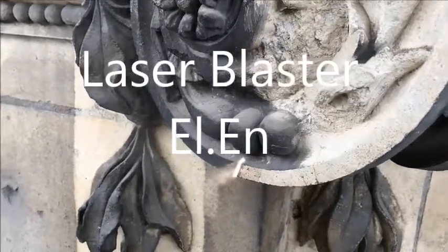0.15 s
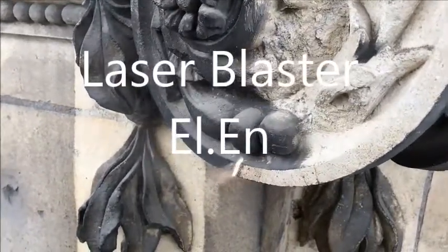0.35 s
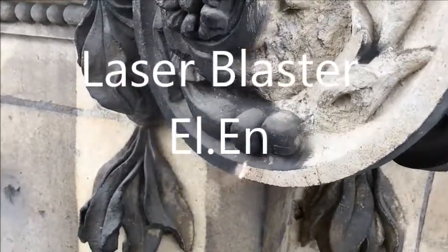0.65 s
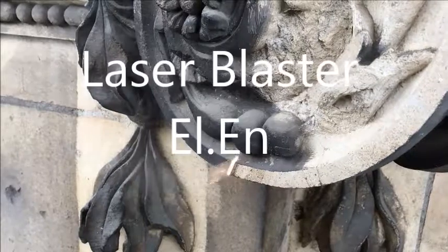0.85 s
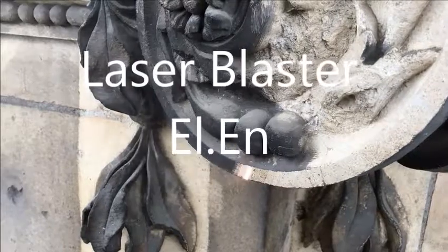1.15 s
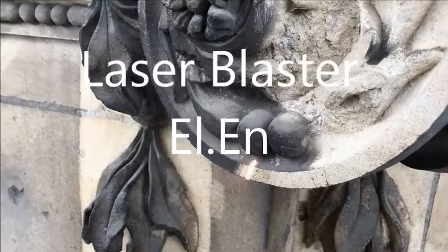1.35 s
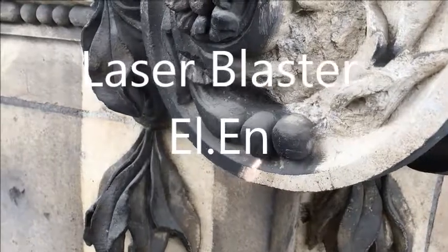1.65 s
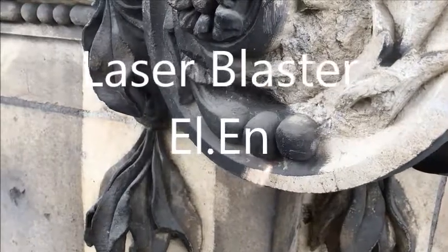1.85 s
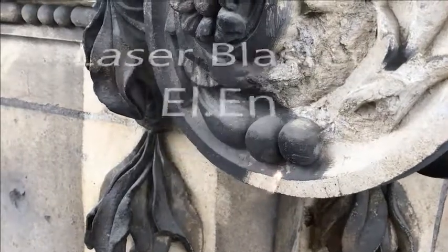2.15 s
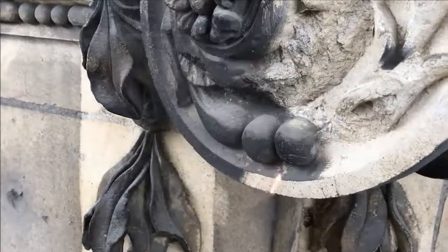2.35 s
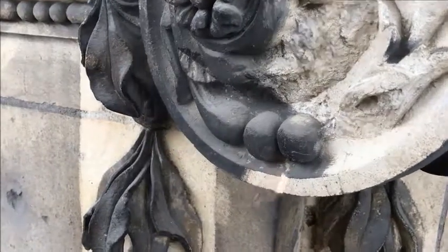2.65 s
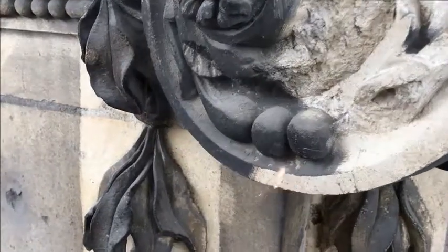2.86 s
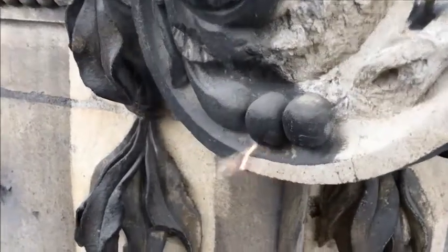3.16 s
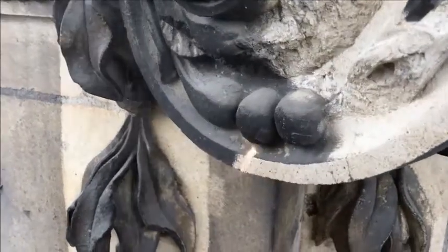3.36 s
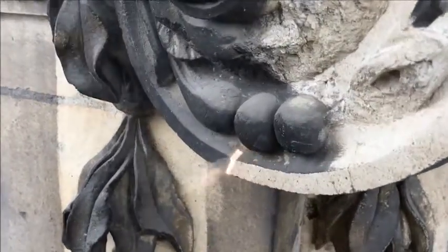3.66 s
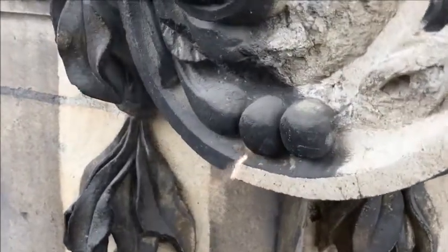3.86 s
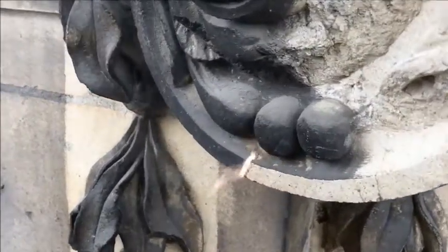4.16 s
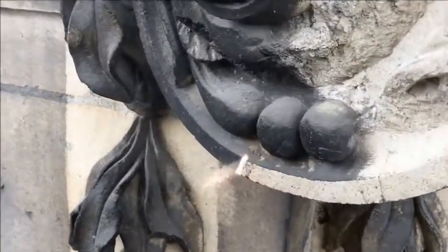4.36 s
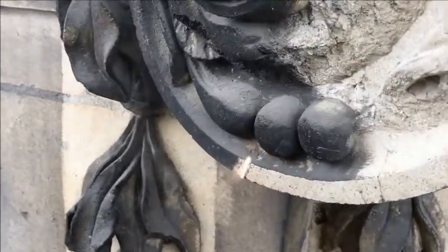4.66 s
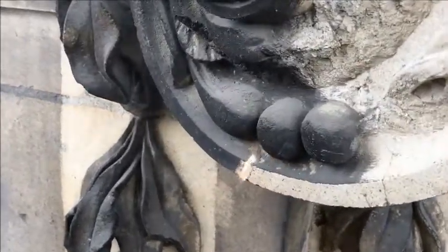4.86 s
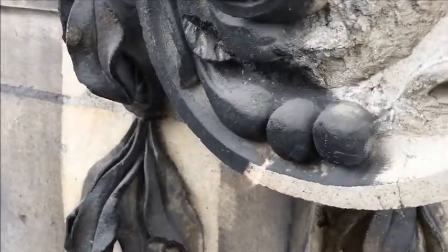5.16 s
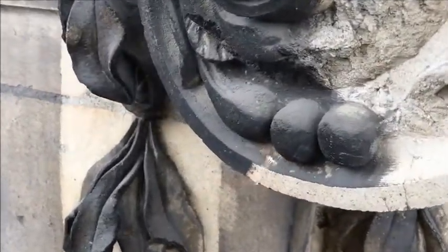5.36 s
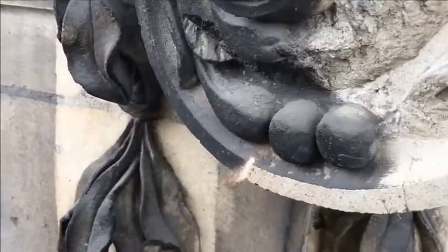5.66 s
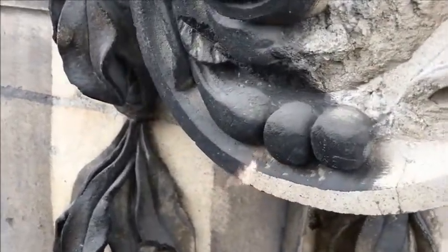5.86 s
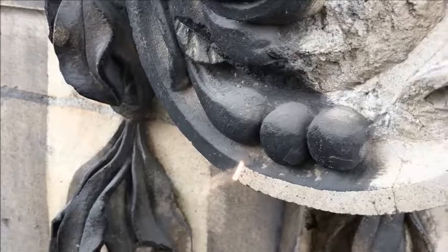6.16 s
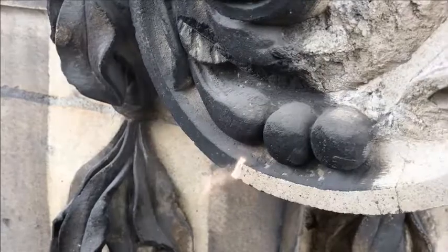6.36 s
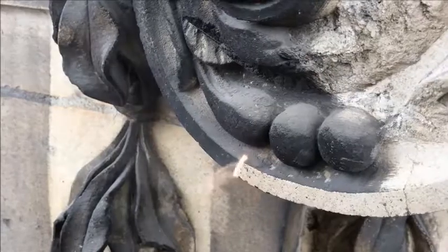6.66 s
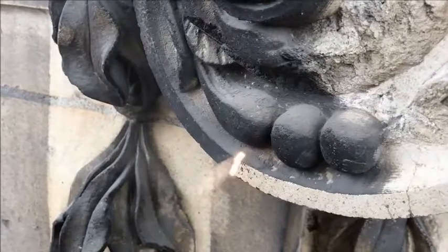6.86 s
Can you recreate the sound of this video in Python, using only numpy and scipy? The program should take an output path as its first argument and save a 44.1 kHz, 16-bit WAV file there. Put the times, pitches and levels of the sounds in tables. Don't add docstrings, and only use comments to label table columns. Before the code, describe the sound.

A laser scours soot from a carved stone rim outdoors, heard close on a phone. A continuous rough buzz, repeating far too fast to count, carries bright gritty sizzle. Loud snaps and flake pops cluster around one to one and a half seconds and just before three; then it runs smoother, weakens near five, and recovers at the end. Faint machine hum, thin fan whine and distant traffic lie beneath.

```python
import sys
import numpy as np
from scipy import signal
from scipy.fft import rfft, irfft, next_fast_len
from scipy.io import wavfile
from scipy.ndimage import uniform_filter1d, map_coordinates

SR = 44100
rng = np.random.default_rng(int(sys.argv[2]) if len(sys.argv) > 2 else 0)


def how_loud(loudness_db):
    steps = np.asarray(loudness_db, float) / 20
    return 10 ** steps


def store_pcm(level_fs):
    pcm = np.round(np.clip(level_fs, -1, 1) * 32767).astype(np.int16)
    wavfile.write(sys.argv[1], SR, np.atleast_2d(pcm).T)


N = 309582
T = np.arange(N) / SR

SWEEP_HZ, SHAKE_HZ, WHINE_HZ = 175, 24.15, 1115.5
WIDTH_MS, SLANT_MS, SLANT_S, NARROWS_MS_PER_S = 1.92, .65, .55, .055
CALM_SHAKE_DB, SOOT_VARIES_DB, FAR_VARIES_DB, FLUTTER_DB = 1, 2.5, 2.5, 2
BRIGHTENS_PER_DB, USUAL_DB = 0.1, -25.5
SNAP_DB, DUST_PER_DB = 2, 0.6
TOP_HZ = 15750

# t/s, turn/ms
TURN_MS = [(0, 2.97), (.91, 2.97), (.93, 2.63), (2.1, 2.63), (4.2, 2.52), (6.3, 2.56), (7.02, 2.61)]
# t/s, lead/turns
SHAKE_LEAD = [(0, 0.23), (.75, 0.92), (2, 0.82), (4.9, 0.5), (5.35, 0.5), (5.7, 1.1), (6.1, 0.93),
              (6.45, 1.52), (7.02, 1.5)]
# t/s, offset/ms
AIM_MS = [(0, .34), (.85, .79), (1.0, .37), (1.4, .5), (1.81, .25), (2.1, .67), (2.4, .48), (2.55, .66),
          (2.7, .46), (3.1, .22), (3.42, .2), (3.51, .52), (4.2, .45), (4.32, .82), (4.61, 1.08),
          (5.55, .46), (5.95, 1.0), (7.02, .63)]
# start/s, end/s, offset/ms
JERKS_MS = [
    (1.15, 1.34, .42),
    (1.53, 1.66, .62),
    (2.78, 2.95, .56),
    (4.06, 4.17, -.25),
]
# start/s, end/s, depth/dB
SHAKE_SPELLS_DB = [
    (.1, .5, -0.4),
    (1.45, 1.65, 0.5),
    (1.95, 2.25, 0.5),
    (2.55, 2.75, 0),
    (3.25, 3.35, 2),
    (3.65, 3.85, 0.8),
    (4.25, 4.95, 0),
    (5.15, 5.62, 3.5),
    (5.85, 6.25, 1),
    (6.45, 6.9, 0.5),
]
# t/s, level/dB
BURN_DB = [(0, -26), (.3, -25), (.6, -23.5), (1.11, -22), (1.6, -24.5), (2.0, -24.5), (2.2, -26),
           (2.55, -25.5), (2.8, -24.5), (3.55, -23.5), (3.98, -25.5), (4.3, -28), (4.67, -26.5), (5.1, -33),
           (5.35, -33), (5.8, -31.5), (6.38, -25.5), (7.02, -24.5)]
# start/s, end/s, level/dB
LAPSES_DB = [(.34, .48, -1.5), (.78, 1.02, -3.5), (1.2, 1.3, -3.5), (1.4, 1.49, -1), (1.66, 1.9, -2.5),
             (2.82, 2.99, -1), (2.875, 2.895, -5), (2.935, 2.96, -5), (3.26, 3.35, -2.5), (3.5, 3.57, -0.5),
             (3.68, 3.81, -3), (4.02, 4.27, -3.5), (4.46, 4.58, -3), (5.12, 5.24, -1), (5.39, 5.7, -2.5),
             (5.455, 5.54, -6), (5.515, 5.54, -6), (6.1, 6.16, 1), (6.48, 6.66, -1.5)]
# start/s, end/s, level/dB
TEARS_DB = [
    (.86, .94, -1),
    (1.2, 1.3, -26),
    (1.56, 1.67, -18),
    (2.82, 2.96, -21),
    (3.72, 3.8, -11),
]
STRETCHES_S = [0, 1.9, 3.0, 4.15, 6.2, 9]
# soot sizzle/dB, far crack/dB; plume push re sizzle/dB
MIX_DB = [
    (-2.5, 7, -18),
    (-7, 6, -13),
    (4, 12.5, -9.5),
    (-5.5, 5, -9.5),
    (-7, 4.5, -12),
]
# delay/ms, share/1
BOUNCES = [
    [(.15, 0.041), (.23, 0.11), (.33, 0.073), (.46, -0.027), (.53, 0.061), (.7, 0.11)],
    [(.11, -0.22), (.27, 0.083), (.38, 0.033), (.43, -0.042), (.54, -0.012), (.71, 0.05)],
    [(.15, 0.0033), (.23, 0.071), (.33, 0.098), (.39, -0.083), (.63, 0.078), (.7, 0.14)],
    [(.11, -0.12), (.16, -0.019), (.31, .11), (.38, -0.11), (.5, -0.1), (.63, 0.1)],
    [(.11, -0.068), (.28, -0.13), (.4, -0.11), (.63, 0.11), (.7, 0.048), (1.05, -0.12)],
]
# delay/ms, share/1
DULL_BOUNCES = [
    [(.41, 0.044), (.77, -0.011), (.99, 0.13), (1.16, 0.096)],
    [(.82, -0.011), (1.15, 0.16), (1.43, -0.18), (1.76, -0.19)],
    [(.52, 0.0015), (.6, -0.0076), (1.17, 0.16), (1.83, 0.038)],
    [(.44, 0.17), (.7, .13), (.97, 0.17), (1.06, -0.079)],
    [(.56, -0.11), (1.08, -0.099), (1.45, -0.3), (1.8, -0.34)],
]
# f/Hz, width/Hz, level/dB
HOLLOWS = [
    [(1660, 91, 4.5), (2380, 73, -6.5), (4700, 200, -4.5), (5500, 120, 1), (6400, 160, 0.5),
     (10100, 290, -2.5), (14000, 430, -0.5)],
    [(1570, 100, 4.5), (2360, 180, -4), (4800, 210, 1), (5960, 330, 1.5), (7800, 400, -3.5), (9500, 790, 4),
     (10400, 250, -3)],
    [(3700, 200, -1), (8200, 220, 0), (10240, 770, -3.5), (13600, 370, -1), (15400, 600, 0)],
    [(3770, 67, -4.5), (5400, 180, 2), (11000, 250, 4), (13300, 900, 3)],
    [(1020, 130, 4.5), (2380, 100, 1), (4500, 250, 2), (7900, 400, -0.5), (9300, 540, 1),
     (12200, 1400, 2.5), (15300, 800, 0)],
]
# f/Hz, level/dB
LANDING_COLOURS = [
    [(300, -33), (525, -7.5), (700, -11.5), (875, -5), (1050, 2.5), (1300, -8.5), (1600, 8), (2100, -7),
     (2400, -12), (3100, -11), (5000, -4), (8000, -60)],
    [(300, -35), (525, -7), (700, -12.5), (875, 3.5), (1050, 0), (1300, -18.5), (1575, -0.5), (1800, -8),
     (2300, -19), (3100, -11), (5000, -15), (8000, -54)],
    [(300, -37.5), (525, -13.5), (700, -11), (1000, 4), (1400, -9), (1620, 2.3), (2100, -11.5),
     (2450, -11.5), (3100, 0), (3600, -9), (4200, 1), (8000, -62)],
    [(300, -33), (525, -6), (700, -7.5), (1000, -2), (1400, -2.5), (1600, -0.5), (2100, -9), (2500, -9.5),
     (3050, -1), (3600, -9.5), (4200, -2.5), (8000, -48)],
    [(300, -33), (525, -5.5), (700, -13), (875, -8.5), (1050, -0.5), (1400, -4), (1575, -1), (2100, -13.5),
     (2450, -3), (2750, -11), (3150, -10), (3600, -6), (4350, 3), (8000, -52)],
]
LANDING_DB = [-15, -11, -11, -11.5, -10.5]
# t/s, blow level/dB, thud level/dB
FLAKES = [(0.2253, -30, -20.5), (0.391, -6, -25), (0.402, -6, -16.5), (0.7645, 6, -18), (1.078, -7, -22),
          (1.232, -23, -38), (1.2437, -3, -42), (1.2722, 2, -29), (1.3063, -4, -40), (1.3121, -3, -50),
          (1.326, 1, -20), (1.6342, 0, -40), (1.6341, -0.5, -27), (1.656, -5, -45), (2.741, -7, -42),
          (2.748, -6, -47), (2.805, -8, -23), (2.8448, 2.5, -38), (2.8681, 1.5, -27), (2.8974, -13, -48),
          (2.9067, -9, -54), (2.9255, -7, -50), (2.93, -9, -45), (1.599, -7, -45), (1.508, -3, -39),
          (1.548, -2, -45)]
# t/s, peak level/dB
TICKS = [(0.2721, -4), (0.4949, -8), (0.5587, -1), (0.5622, -9), (0.6765, 3), (0.7056, -8), (0.8267, -10),
         (1.118, 3), (1.1692, 0), (1.1978, -4), (1.1993, -9), (1.258, -6), (1.2721, 0), (1.2894, -9),
         (1.3063, 0), (1.312, 3), (1.3655, -11), (1.426, -10), (1.4516, -10), (1.5464, -8), (1.5652, -6),
         (1.674, -7), (1.9088, -9), (2.7135, -10), (2.7463, -1), (2.771, -8), (2.829, -5), (2.8493, 1),
         (2.8551, 0), (2.8779, -6), (2.9026, -6), (2.905, 0), (2.9065, -7), (2.9619, -12), (2.9704, -6),
         (2.9963, -14), (3.3629, -8), (3.443, -5), (3.4602, -2), (3.6488, -14), (3.814, -8), (3.825, -11),
         (3.9002, -11), (3.9288, -10), (4.4378, -4), (4.454, -15), (4.4835, -12), (4.4892, -11),
         (4.5121, -11), (5.0489, -16), (5.5563, -21), (5.642, -14), (6.1978, -12), (6.2378, -9),
         (6.8805, -6), (6.9005, -2)]
# start/s, end/s, level re quiet/dB
HUM_SWELLS_DB = [
    [(.8, .95, 7), (1.2, 1.45, 2), (1.55, 1.72, 8.5), (2.0, 2.18, 7), (2.42, 2.62, 10), (2.75, 2.97, 13.5),
     (2.97, 3.2, 5.5), (3.45, 3.64, 8), (3.7, 4.07, 5.5), (4.25, 5.02, 9.5), (5.18, 5.45, 9.5),
     (5.75, 6.3, 13.5), (6.3, 7.1, 9)],
    [(-.1, .9, 8.5), (1.07, 1.17, 15), (1.25, 1.53, 12.5), (1.66, 2.8, 14), (2.95, 3.2, 14.5),
     (3.39, 3.66, 16), (3.83, 4.01, 14), (4.68, 5.6, 14), (5.83, 6.4, 10), (6.4, 7.1, 6.5)],
]
QUIET_HUM_DB = -56, -59
# t/s, level/dB
WHINE_DB = [(0, -52), (2, -51), (3.5, -50), (4.6, -47), (5.7, -45), (6.3, -49), (7.02, -50)]
# f/Hz, level/dB
SIZZLE_COLOUR = [(200, -47), (700, -18), (900, -4), (1100, -3), (1350, -6), (1700, -6), (2150, -2.5),
                 (2360, -7), (2600, -3.5), (3300, -3), (4700, -4), (5500, -0.5), (8000, -0.5),
                 (10500, -0.5), (13000, 0.5), (14600, 1.8), (15600, -1.5)]
# f/Hz, level/dB
PUSH_COLOUR = [(300, -49), (480, 4.5), (750, -9), (900, 18), (1050, 8.5), (1300, -17), (1600, 6.5),
               (2350, -4), (3100, -6), (4400, 1), (6500, 11.5), (9000, -24)]
# f/Hz, level/dB
FLAKE_COLOUR = [(60, -27), (250, -4.5), (900, 7), (2500, 5.5), (6000, 2.5), (15000, -1)]
# f/Hz, level/dB
STREET_COLOUR = [(20, -32), (32, -14.5), (54, -4.5), (70, -7.5), (120, -13), (300, -11.5), (600, -13),
                 (1500, -12.5), (5000, -43.5), (15000, -84)]


def laser():
    soot_db, far_db, push_db = mix()
    burn, cracks, plume, landings = burning(scatter_db=2.5, soot_db=soot_db, far_db=far_db)
    spark_db = 3.2 * np.clip(rng.standard_normal(N), -3, 2.2)
    sparks = burn * unit((rng.standard_normal(N) - .6) * how_loud(spark_db))
    level = np.std(sparks)
    snaps = how_loud(SNAP_DB) * np.diff(cracks, 2, prepend=[0, 0])
    sizzle = level * unit(coloured(sparks + snaps, SIZZLE_COLOUR))
    treble = np.convolve(sizzle, [-.25, .5, -.25], "same")
    sizzle = sizzle + np.clip(BRIGHTENS_PER_DB * (strength_db() - USUAL_DB), -.8, 1) * treble
    push = level * unit(coloured(-plume, PUSH_COLOUR))
    direct = how_loud(2.0) * sizzle + how_loud(push_db - 9.5) * push
    return carving(direct + walls(sizzle)) + buzz(landings)


def burning(scatter_db, soot_db, far_db):
    near = curve(AIM_MS) + spans(JERKS_MS, edge_s=.04)
    far = near + WIDTH_MS + SLANT_MS * np.exp(-T / SLANT_S) - NARROWS_MS_PER_S * T
    far = np.minimum(far, 2.85)
    period_ms = 1000 / SWEEP_HZ
    since_ms = (1000 * T - curve(TURN_MS) + period_ms / 2) % period_ms - period_ms / 2
    place_ms = np.abs(since_ms)
    shake = np.cos(2 * np.pi * (SHAKE_HZ * T + curve(SHAKE_LEAD)))
    shake_db = CALM_SHAKE_DB + spans(SHAKE_SPELLS_DB, edge_s=.04)

    def bump(at_ms, width_ms):
        return np.exp(-((place_ms - at_ms) / width_ms) ** 2)

    def step(at_ms):
        return .5 + .5 * np.tanh((place_ms - at_ms) / .04)

    landings = (since_ms > 0) * bump(near + .015 * shake + .006 * wobble(40), .055)
    near = near + .035 * shake + .012 * wobble(60)
    far = far + .04 * shake + .02 * wobble(60)
    near_crack = how_loud(np.where(since_ms > 0, 4.5, -.6)) * bump(near + .04, .055)
    far_crack = how_loud(far_db - 8.0) * bump(far, 0.039)
    dust = how_loud(-14 - DUST_PER_DB * spans(TEARS_DB, edge_s=0.0072))
    soot = how_loud(soot_db - 2.5) * step(near) + how_loud(far_db - 19.0) * step(far) + dust
    parts = np.array([near_crack, far_crack, soot])
    specks = map_coordinates(rng.standard_normal((40, 90)), [9 * place_ms, 5 * T])
    parts[2] *= how_loud(3 * specks)
    sweep_rms = np.sqrt(np.abs(uniform_filter1d(parts.sum(0) ** 2, size=SR // SWEEP_HZ)))
    parts = parts * how_loud(strength_db() + shake_db * shake) / sweep_rms
    chance_db = scatter_db * np.clip([wobble(200), wobble(230), 0.24 * wobble(700)], -2.5, 1.4)
    uneven = parts * how_loud(chance_db)
    plume = (parts * how_loud(chance_db / 3)).sum(0)
    return uneven.sum(0), uneven[:2].sum(0), plume, landings


def mix():
    ends_s = STRETCHES_S[1:]
    soot_db, far_db, push_db = (spans(zip([-1] + ends_s, ends_s, c), .1) for c in np.transpose(MIX_DB))
    soot_db = soot_db + SOOT_VARIES_DB * wobble(3.91)
    far_db = far_db + FAR_VARIES_DB * wobble(4.085)
    push_db = push_db + spans(TEARS_DB, edge_s=0.003) + FLUTTER_DB * wobble(30)
    return soot_db, far_db, push_db


def strength_db():
    return curve(BURN_DB) + spans(LAPSES_DB, edge_s=0.017)


def buzz(landings):
    voices = [how_loud(db) * unit(coloured(-landings, c)) for c, db in zip(LANDING_COLOURS, LANDING_DB)]
    level_db = strength_db() + 0.51 * spans(TEARS_DB, edge_s=0.0041)
    level_db = level_db + 3.1 * wobble(25) + 0.58 * wobble(4.96)
    return how_loud(level_db) * (shares() * voices).sum(0)


def walls(sizzle):
    t = T[:SR // 20]
    tail = rng.standard_normal(len(t)) * how_loud(-60 * t / 0.039)
    return how_loud(-12) * signal.fftconvolve(sizzle, tail / np.linalg.norm(tail))[:N]


def carving(x):
    m = next_fast_len(N + 999)
    hz, spectrum = np.fft.rfftfreq(m, 1 / SR), rfft(x, m)

    def returns(rows):
        return sum(share * np.exp(-2j * np.pi * hz * ms / 1000) for ms, share in rows)

    def hollows(rows):
        return how_loud(sum(db * np.exp(-((hz - mid_hz) / width_hz) ** 2) for mid_hz, width_hz, db in rows))

    duller = 1 / (1 + (hz / 6000) ** 4)
    colours = [np.exp(returns(b) + returns(d) * duller) * hollows(h)
               for b, d, h in zip(BOUNCES, DULL_BOUNCES, HOLLOWS)]
    return (shares() * irfft(spectrum * colours, m)[:, :N]).sum(0)


def shares():
    return -np.diff([np.clip((T - s) / .2 + .5 + (s == 0), 0, 1) for s in STRETCHES_S], axis=0)


def flakes():
    blows, ticks, thuds = np.zeros(N), np.zeros(N), np.zeros(N + SR)
    t = T[:SR // 20]
    thud = how_loud(-60 * t / 0.017) * (1 - np.exp(-t / 0.0018)) * np.sin(2 * np.pi * 230 * t)
    for s, blow_db, thud_db in FLAKES:
        i = round(s * SR)
        blows[i] = -how_loud(blow_db + 2.5)
        thuds[i:i + len(t)] += how_loud(thud_db) * thud
    for s, db in TICKS:
        ticks[round(s * SR)] = how_loud(db + 2.0)
    ticks = np.convolve(ticks, [0.35, .45, -1.2, 0.083, 0.18], "same")
    return carving(coloured(blows, FLAKE_COLOUR) + ticks) + thuds[:N]


def machine():
    first_db = QUIET_HUM_DB[0] + spans(HUM_SWELLS_DB[0], edge_s=0.058) + 5
    second_db = QUIET_HUM_DB[1] + spans(HUM_SWELLS_DB[1], edge_s=.03) + 2
    whine_db = curve(WHINE_DB) + 3 + 1.5 * wobble(9)
    first = how_loud(first_db) * np.cos(2 * np.pi * SWEEP_HZ * T + 0.57 * wobble(15))
    second = how_loud(second_db) * np.cos(4 * np.pi * SWEEP_HZ * T + .35 * wobble(7))
    whine = how_loud(whine_db) * np.sin(2 * np.pi * WHINE_HZ * T + .9 * wobble(5))
    return first + second + whine


def street():
    return how_loud(-44.0 + 0.11 * wobble(1.42)) * unit(coloured(rng.standard_normal(N), STREET_COLOUR))


def unit(x):
    return x / np.sqrt(np.mean(x ** 2) + 1e-20)


def curve(rows):
    s, value = np.transpose(rows)
    return np.interp(T, s, value)


def spans(rows, edge_s):
    return sum(size / 2 * (np.tanh((T - a) / edge_s) - np.tanh((T - b) / edge_s)) for a, b, size in rows)


def wobble(rate_hz):
    return map_coordinates(rng.standard_normal(int(N * rate_hz / SR) + 4), [T * rate_hz])


def coloured(x, points):
    hz, db = np.transpose(points)
    grid_hz = np.fft.rfftfreq(4096, 1 / SR)
    gain = how_loud(np.interp(np.log(grid_hz + 1), np.log(hz), db))
    cepstrum = irfft(np.log(gain))
    cepstrum[1:2048] *= 2
    cepstrum[2049:] = 0
    return signal.fftconvolve(x, irfft(np.exp(rfft(cepstrum))))[:N]


def scene():
    return (laser() + flakes() + machine() + street())[None]


def top_cut(x):
    return signal.sosfilt(signal.butter(12, 17020, fs=SR, output="sos"), x)


def record(dry):
    m = next_fast_len(N)
    soft = dry / (1 + np.abs(dry / .8) ** 4) ** .25
    in_band = np.fft.rfftfreq(m, 1 / SR) < TOP_HZ
    kept = irfft(rfft(soft, m) * in_band, m)[:, :N]
    return top_cut(kept)


dry = scene()
out = record(dry)
store_pcm(out)
```